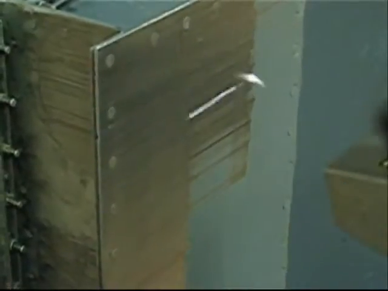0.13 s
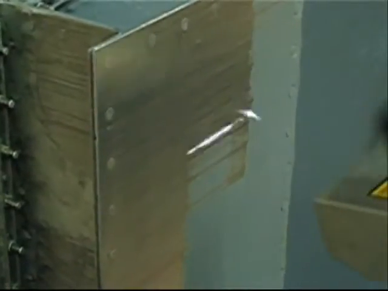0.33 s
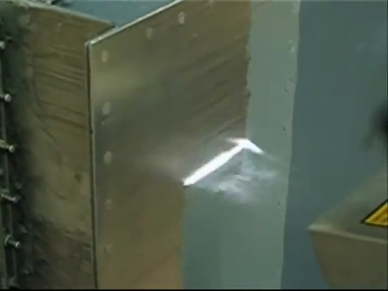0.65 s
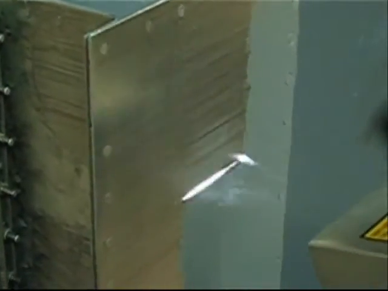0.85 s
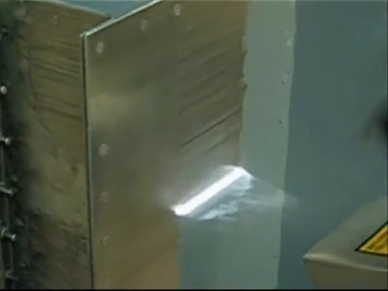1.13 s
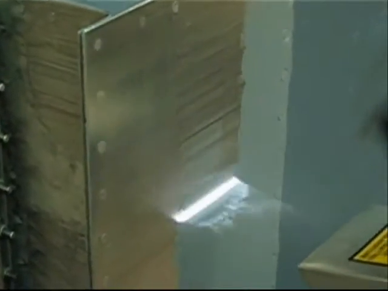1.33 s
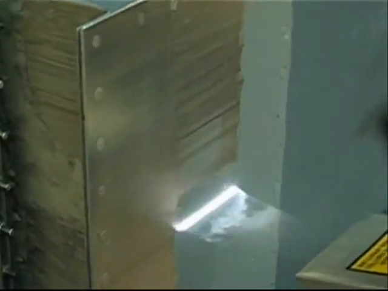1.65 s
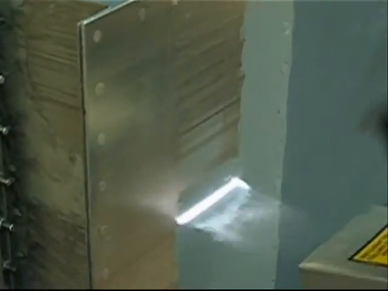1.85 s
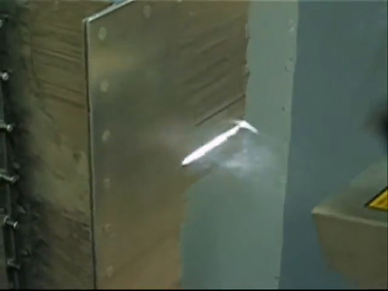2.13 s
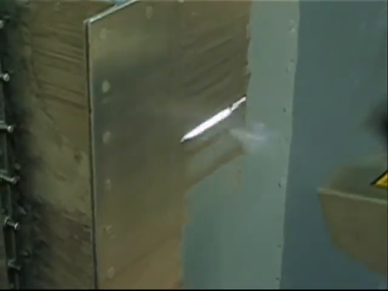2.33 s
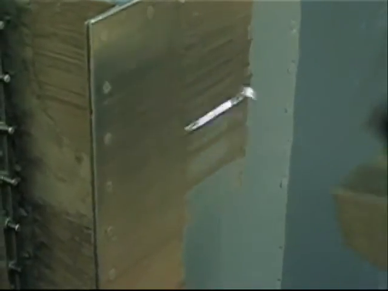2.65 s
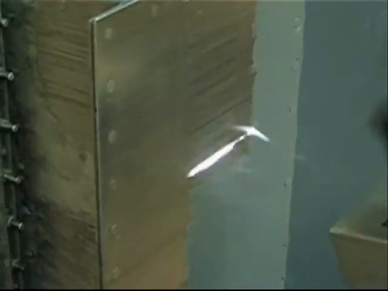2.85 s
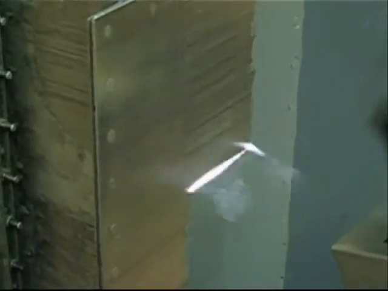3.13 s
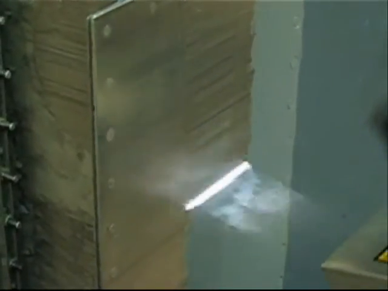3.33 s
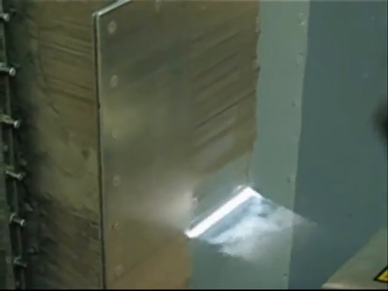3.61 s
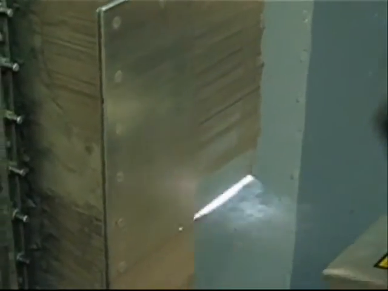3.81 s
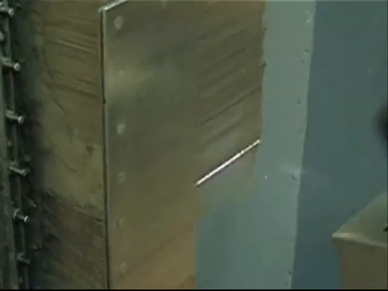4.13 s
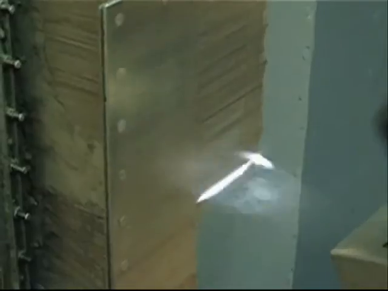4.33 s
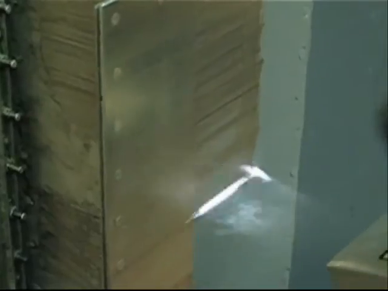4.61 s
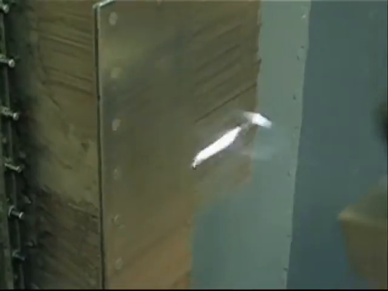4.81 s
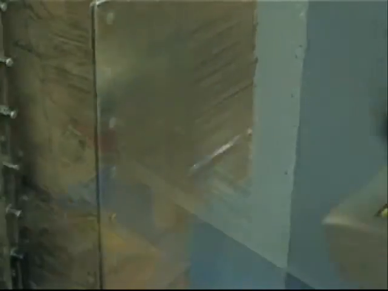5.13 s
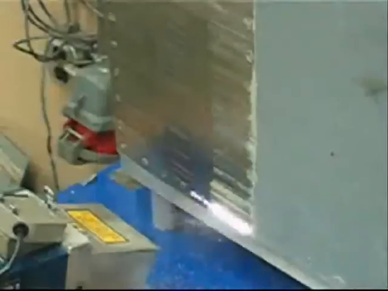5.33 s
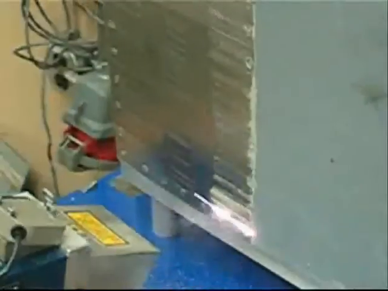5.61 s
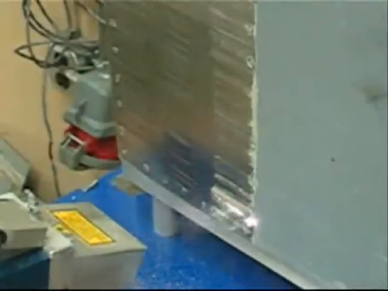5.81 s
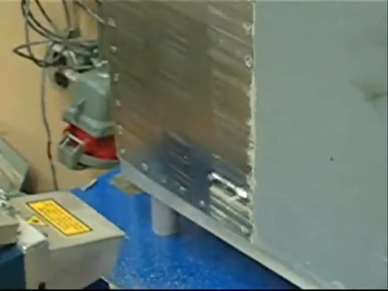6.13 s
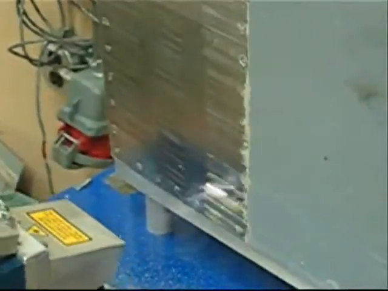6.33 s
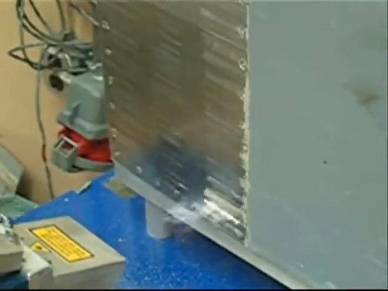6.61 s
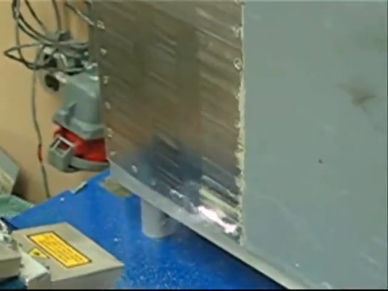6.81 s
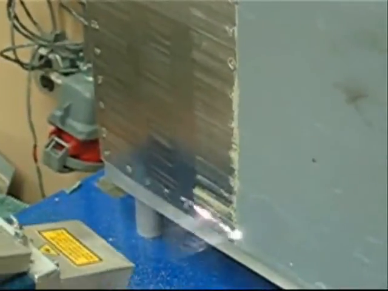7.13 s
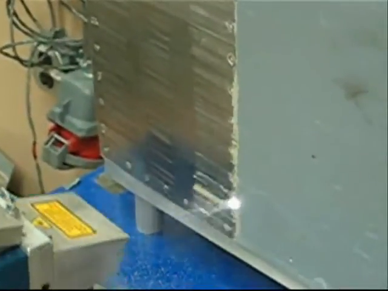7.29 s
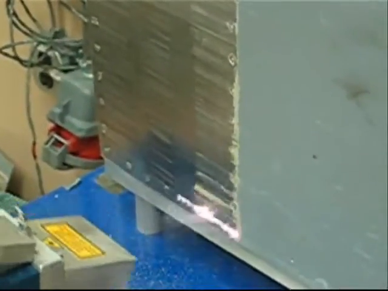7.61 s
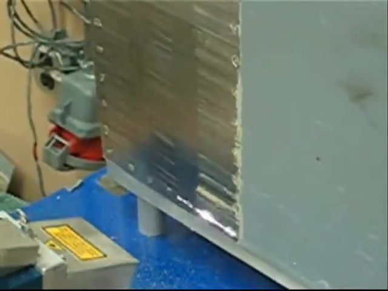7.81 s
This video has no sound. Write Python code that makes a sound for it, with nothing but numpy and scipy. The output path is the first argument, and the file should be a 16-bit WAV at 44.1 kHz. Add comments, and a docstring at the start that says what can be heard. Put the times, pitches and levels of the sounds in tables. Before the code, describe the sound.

A laser sizzles and buzzes paint off a metal panel over a rushing, howling air extractor and electrical hum, then wind buffets the microphone.

```python
"""Laser stripping paint in a workshop

A hand-held laser sweeps to and fro over a metal panel, and the paint sizzles and buzzes as it bursts off.
An air extractor rushes and howls over a mains hum. After five seconds the sound fades from an upper
spot to one low by the panel, where a draught buffets the microphone. A cheap camera hears it in mono."""
import sys
import numpy as np
from scipy import signal
from scipy.fft import rfft, irfft, next_fast_len
from scipy.io import wavfile
from scipy.ndimage import uniform_filter1d

SR = 44100
rng = np.random.default_rng(int(sys.argv[2]) if len(sys.argv) > 2 else 0)


def bounce(signal):
    """Save signal as a 16-bit WAV file at the path given by the first command-line argument."""
    frames = np.transpose(np.atleast_2d(signal))
    limited = np.clip(frames, -1, 1)
    pcm = np.round(limited * 32767).astype(np.int16)
    wavfile.write(sys.argv[1], SR, pcm)


N = 351036
TIME = np.arange(N) / SR
HZ = np.maximum(np.fft.rfftfreq(next_fast_len(N), 1 / SR), 1)
SWEEP_HZ = 140.05   # sweeps of the beam per second


def paint_sizzle(spectrum, sweep_depth, turn_depth, bursts_per_s, crackle_db, flicker_db):
    """Tiny bursts of paint, pulsing once per sweep of the beam and again at each turn."""
    phase = 2 * np.pi * SWEEP_HZ * TIME
    beam = 1 + sweep_depth * np.cos(phase) + turn_depth * np.cos(2 * phase)
    flakes = (rng.random(N) < bursts_per_s / SR) * rng.standard_normal(N)
    bursts = rng.standard_normal(N) + from_db(crackle_db) * rms_one(flakes)
    flicker = from_db(flicker_db * drift(17))
    return rms_one(filtered(bursts * beam * flicker, colour(spectrum)))


def sweep_buzz(wander_db, wander_radians):
    """Each sweep repeats the same puff. Its overtones waver as the hand shifts their paths in the room."""
    # strength of the overtones by pitch: f/Hz, level/dB
    overtones = [(280, -50), (430, -63), (560, -62), (700, -46), (840, -50), (1100, -59), (1400, -53),
                 (1620, -61), (1850, -54), (2520, -54), (2750, -62), (3850, -58), (4150, -66), (5400, -69)]
    hz, db = np.transpose(overtones)
    buzz = np.zeros(N)
    for overtone_hz in SWEEP_HZ * np.arange(2, 39):
        level_db = np.interp(np.log(overtone_hz), np.log(hz), db) + wander_db * drift(0.99)
        phase = 2 * np.pi * overtone_hz * TIME + wander_radians * drift(1)
        buzz += from_db(level_db) * np.sin(phase)
    return np.sqrt(2) * buzz


def hand_strokes():
    """Gains of rush, howl, sizzle and hum: each stroke of the laser head moves them together."""
    # strokes of the hand: peak t/s, length/s, air lift/dB, sizzle lift/dB
    strokes = [(.22, 0.12, 3, 2), (0.457, 0.33, 3.5, 4), (1.083, 0.16, 2.4, 1), (2.726, 0.26, 3.5, 2),
               (3.25, 0.18, 2, 4.5), (4.373, 0.15, 2.5, 1), (5.674, .14, -.5, 6.5), (6.307, 0.22, 2.4, -3),
               (6.674, 0.25, 1, 5), (6.986, 0.29, 1.6, 3.5), (7.275, 0.18, 1.9, 3), (7.54, 0.22, 2.5, 2.6),
               (7.71, 0.1, 1.7, 7.5), (7.92, 0.2, 2, 2.5)]
    # slow rise and fall of the duct's howl: t/s, level/dB
    howl_curve = [(0, -30), (.22, -35.5), (.35, -28.5), (.55, -32.5), (.72, -29.5), (1.15, -36.5),
                  (1.4, -38.5), (1.58, -33), (1.9, -34), (2.3, -30.5), (2.78, -30), (3.5, -31.5),
                  (3.92, -35.5), (4.08, -29.5), (4.22, -30.5), (5.25, -30.5), (5.5, -33), (7.96, -33.5)]
    air_db = sum(db * swell(s, length / 2) for s, length, db, _ in strokes)
    burn_db = sum(db * swell(s, length / 2) for s, length, _, db in strokes)
    howl_db = np.interp(TIME, *np.transpose(howl_curve))
    swing_db = howl_db - howl_db.mean()
    opening_db = np.interp(TIME, [0, 0.2], [-1, 0])   # rush and hum start a little low
    rush = from_db(-30.5 + air_db + 0.15 * swing_db + opening_db)
    howl = from_db(howl_db + 1.54 * air_db)
    sizzle = from_db(-38.5 + burn_db + 0.27 * swing_db)
    hum = from_db(-30.53 + 0.98 * air_db + opening_db)
    return rush, howl, sizzle, hum


def air_rush(spectrum, resonances):
    """Swirling air in the extractor, louder at the pitches where duct and room ring."""
    ringing_db = sum(lift_db * bell(hz, width) for hz, width, lift_db in resonances)
    gain = colour(spectrum) * from_db(ringing_db)
    heart = (HZ > 680) & (HZ < 1150)   # this band is brought to a level of 1
    return noise(gain) * np.sqrt(np.sum(gain ** 2) / np.sum(gain[heart] ** 2))


def duct_howl(tones):
    """The flow makes the duct ring at two close pitches: a breathy, fluttering tone."""
    gain = sum(from_db(db) * bell(hz, width) for hz, width, db in tones)
    return steadied(noise(gain), samples=8000)


def mains_hum(octave_db, waver_radians, hum_hz=120.05):
    """The power supply hums at twice the mains rate, with a weaker, unsteady tone an octave up."""
    phase = 2 * np.pi * hum_hz * TIME + waver_radians * drift(7.8)
    octave = from_db(octave_db + 3.3 * drift(2.6)) * np.sin(2 * phase + 1.5 * drift(4))
    return np.sqrt(2) * (np.sin(phase) + octave)


def draught(full_at_s=5.54, rise_db_per_s=93):
    """Swirls of air hit the microphone: big slow ones rumble, small fast ones come in short puffs."""
    # tone of the swirls: f/Hz, relative level/dB
    spectrum = [(8, -18), (24, -4.5), (70, -1), (150, -2), (250, -5.5), (400, -11), (600, -17), (900, -37),
                (2000, -53)]
    # strongest gusts: peak t/s, rumble lift/dB, puff lift/dB
    gusts = [(5.53, 3, 9.5), (5.61, 1, 1), (5.75, 3.5, 1), (5.855, 2.5, 3.5), (6.03, 4, 1.5),
             (6.145, 6.5, 6), (6.32, -0.5, 6.5), (6.5, 8, 9.5), (6.685, 2, 9), (6.8, 4.5, 7),
             (6.91, 2.5, 2.5), (6.985, 1.5, 10.5), (7.13, 2.5, 8.5), (7.325, 1.5, 2), (7.42, 3, 3.5),
             (7.78, 4, -0.5), (7.88, 4.5, 4)]
    onset_db = rise_db_per_s * np.minimum(TIME - full_at_s, 0)
    rumble_lift_db, puff_lift_db = sum(np.outer(lifts, swell(s, 0.028)) for s, *lifts in gusts)
    rumble_gain = from_db(-20.5 + onset_db + rumble_lift_db + 1.1 * drift(4))
    puff_gain = from_db(-26 + onset_db + puff_lift_db + 2.6 * drift(17))
    swirls = colour(spectrum)
    deep = 1 / (1 + (HZ / 185) ** 8)   # the rumble's share of each frequency
    rumble = noise(swirls * np.sqrt(deep))
    puffs = noise(swirls * np.sqrt(1 - deep)) * from_db(5.5 * drift(53))
    return rumble_gain * steadied(rumble, samples=2800) + puff_gain * steadied(puffs, samples=1800)


def upper_spot(rush, howl, sizzle, hum):
    """Higher up, the beam's buzz and the hum stand out beside sizzle and extractor."""
    # tone of the bursting paint and of the rushing air: f/Hz, relative level/dB
    paint_spectrum = [(900, -39), (1700, 3), (2400, 2), (3500, 2), (4400, 4.5), (5500, -5.5)]
    air_spectrum = [(30, -5), (80, -0.5), (160, -6.5), (400, -6.0), (700, 0.87), (1100, -6.5),
                    (1450, -14.5), (1600, -23.5), (2100, -7.5), (2700, -11), (3600, -19.5), (5400, -17.5)]
    # pitches where duct and room ring: f/Hz, width/Hz, lift/dB
    resonances = [(132, 69, 8.5), (247.4, 67, 9), (348, 51, 5), (458, 15, 3.5), (508, 24, 3),
                  (618.6, 9.9, 10), (750, 38, 6.5), (802, 19, 1.5), (845, 33, 6), (918, 23, 9),
                  (1072.6, 35, 11.5), (1133, 110, 5.5), (1530, 29, 1), (1667, 237, 10), (1800, 88, 4),
                  (1980, 38, 5.5), (2056, 24, 7.5), (2080, 10, 5), (2214, 40, 4.5), (2393, 44, 6.5),
                  (2670, 31, 5.5), (3232, 95, 10)]
    # the duct's two howling tones: f/Hz, width/Hz, relative level/dB
    tones = [(1228, 29, -7), (1320, 66, 0)]
    paint = paint_sizzle(paint_spectrum, sweep_depth=0.12, turn_depth=0.078,
                         bursts_per_s=1900, crackle_db=-17, flicker_db=1.1)
    return (sizzle * paint
            + from_db(0.5) * sweep_buzz(wander_db=3, wander_radians=2.62)
            + rush * air_rush(air_spectrum, resonances)
            + howl * from_db(-0.8) * duct_howl(tones)
            + hum * mains_hum(octave_db=-13, waver_radians=0.091))


def lower_spot(rush, howl, sizzle):
    """Low by the panel the paint crackles more, the hum is faint and a draught blows."""
    # tone of the bursting paint and of the rushing air: f/Hz, relative level/dB
    paint_spectrum = [(900, -17), (1700, 0.5), (2300, 0), (2700, 13.5), (3100, 12), (3500, -2.5), (4400, 3),
                      (5500, -1.5)]
    air_spectrum = [(30, 14.5), (80, 9), (160, 4), (400, -6.5), (700, -7), (1100, -9), (1450, -21.5),
                    (1700, -21), (2100, -8), (3000, -12), (3600, -17), (5400, -20)]
    # pitches where duct and room ring: f/Hz, width/Hz, lift/dB
    resonances = [(632, 186, 4.7), (754, 24, 8.7), (818, 34, 9.5), (873, 30, 3.9), (989, 80, 7.3),
                  (1078, 17, 12.6), (1540, 68, 8.9), (1650, 190, 5), (1774, 50, 5.2), (1940, 24, 5),
                  (1940, 22, 6.4), (2090, 19, 4.9), (2340, 21, 8.9), (2800, 18, 2.2), (3144, 76, 10.1),
                  (3430, 46, 6.1), (3914, 42, 10.5), (4830, 22, 10)]
    # the duct's two howling tones: f/Hz, width/Hz, relative level/dB
    tones = [(1221, 28, 4.7), (1244, 140, 14)]
    paint = paint_sizzle(paint_spectrum, sweep_depth=0.04, turn_depth=0.04,
                         bursts_per_s=1800, crackle_db=-7.5, flicker_db=2.1)
    return (sizzle * from_db(3) * paint
            + rush * from_db(-1.36) * air_rush(air_spectrum, resonances)
            + howl * from_db(2) * duct_howl(tones)
            + from_db(-40) * mains_hum(octave_db=-20, waver_radians=0.11)
            + draught())


def from_db(db):
    """Turn decibels into a gain, the number a sound is multiplied by."""
    return 10 ** (np.asarray(db) / 20)


def rms_one(x):
    """Scale to an average level (rms) of 1."""
    return x / np.sqrt(np.mean(x ** 2) + 1e-20)


def colour(points):
    """Gain at every frequency from a few points of f/Hz, level/dB."""
    hz, db = np.transpose(points)
    return from_db(np.interp(np.log(HZ), np.log(hz), db))


def bell(hz, width):
    """A hump around one ringing pitch, 1 on top."""
    return 1 / (1 + (2 * (HZ - hz) / width) ** 2)


def swell(peak_s, half_length_s):
    """A rounded rise and fall in time, 1 on top."""
    return np.exp(-((TIME - peak_s) / half_length_s) ** 2)


def filtered(x, gain):
    """Give each frequency its own gain."""
    return irfft(rfft(x, next_fast_len(N)) * gain, next_fast_len(N))[:N]


def noise(gain):
    """Filtered noise with a level of 1."""
    return rms_one(filtered(rng.standard_normal(N), gain))


def drift(rate_hz):
    """A smooth random wander, about 1 in size; a higher rate wanders faster."""
    step, warm_up = 40, 2000
    pole = np.exp(-2 * np.pi * rate_hz * step / SR)
    kicks = rng.standard_normal(N // step + warm_up + 2)
    slow = signal.lfilter([1], [1, -2 * pole, pole * pole], kicks)[warm_up:]
    return np.interp(np.arange(N) / step, np.arange(len(slow)), rms_one(slow))


def steadied(x, samples):
    """Even out the slow changes in a noise's level, keeping its fast flutter."""
    return x / np.sqrt(uniform_filter1d(x ** 2, samples) + 1e-12)


def scene():
    """The upper spot fades into the lower one."""
    rush, howl, sizzle, hum = hand_strokes()
    upper = upper_spot(rush, howl, sizzle, hum)
    lower = lower_spot(rush, howl, sizzle)
    lower_share = np.interp(TIME, [5.22, 5.52], [0, 1])
    return (np.sqrt(1 - lower_share) * upper + np.sqrt(lower_share) * lower)[None]


def record(dry):
    """A cheap camera: loud peaks are rounded, and its converter is slow and rests a little off zero."""
    ceiling, offset = 0.62, 0.055
    camera_rate_hz, cutoff_hz = 11025, 12600
    rounded = dry[0] / (1 + (dry[0] / ceiling) ** 6) ** (1 / 6)
    narrow = filtered(rounded, HZ < camera_rate_hz / 2)
    # holding each sample mirrors the howl into thin whistles in the treble
    hold = round(SR / camera_rate_hz)
    held = np.repeat(narrow[::hold], hold)[:N]
    softened = filtered(held, 1 / np.sqrt(1 + (HZ / 19000) ** 4))
    return offset + filtered(softened, 1 / np.sqrt(1 + (HZ / cutoff_hz) ** 240))[None]


dry = scene()
out = record(dry)
bounce(out)
```